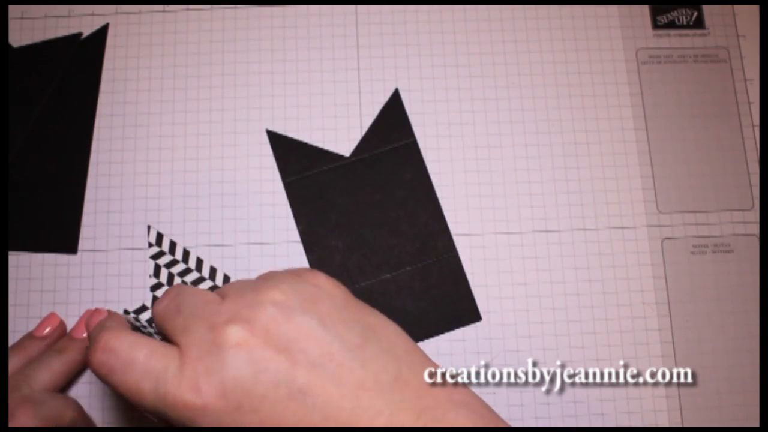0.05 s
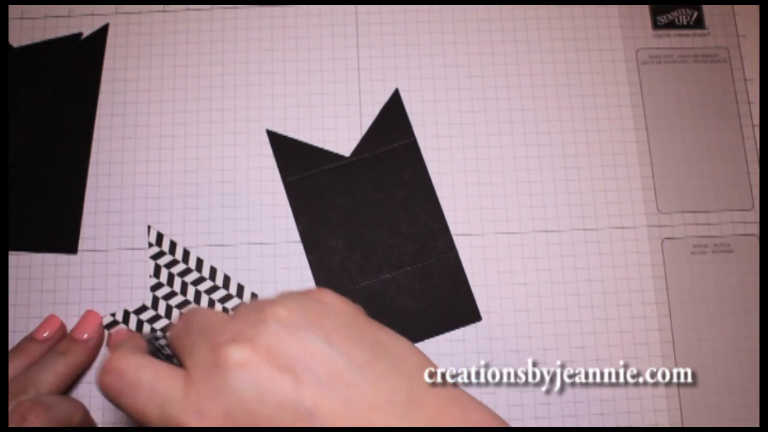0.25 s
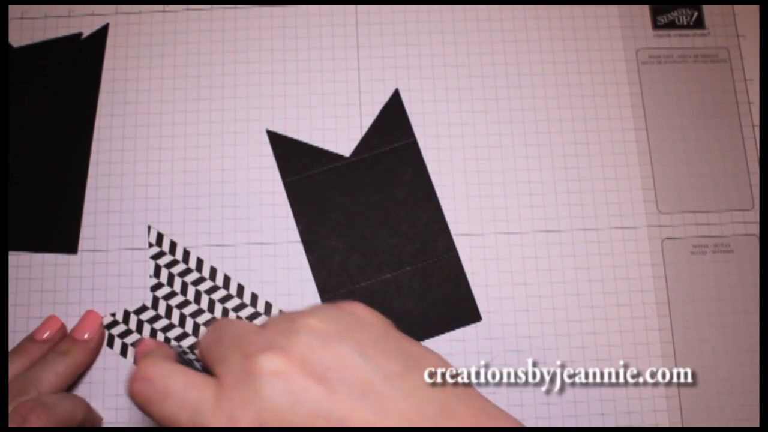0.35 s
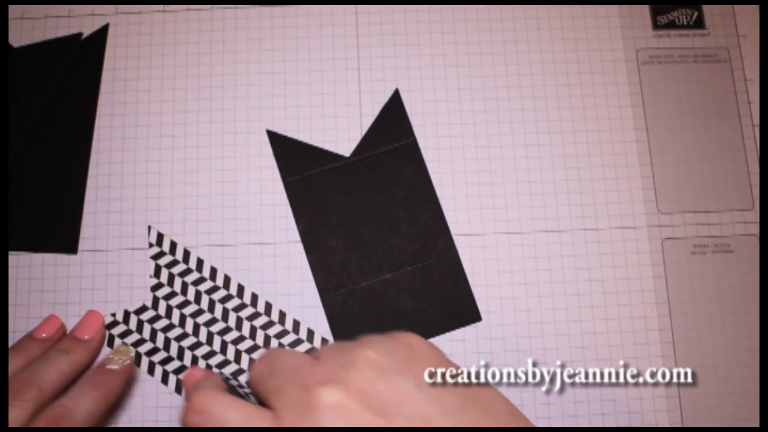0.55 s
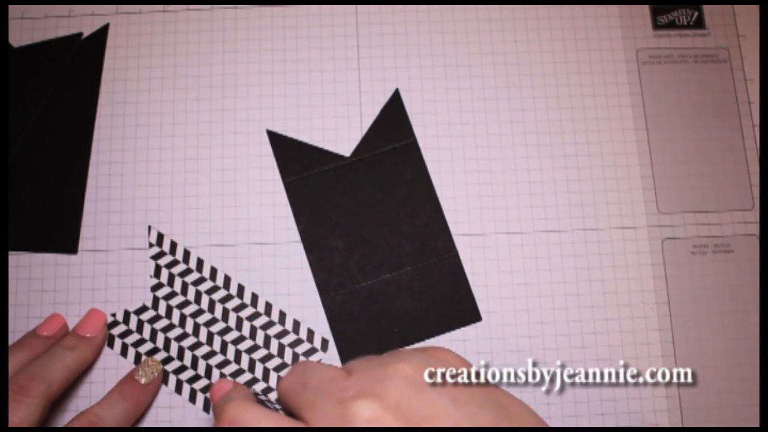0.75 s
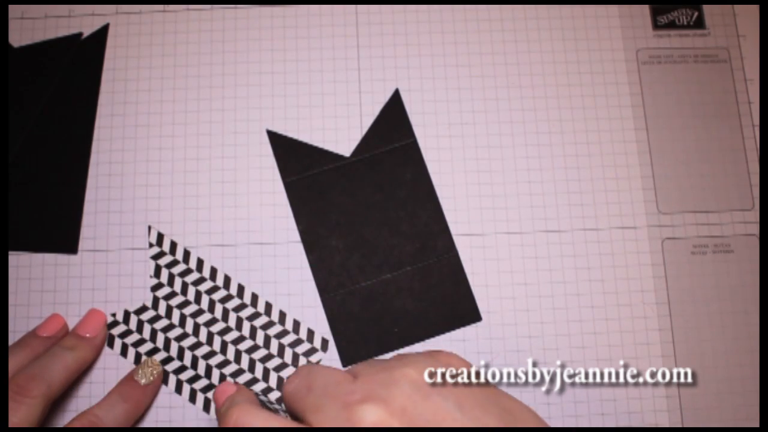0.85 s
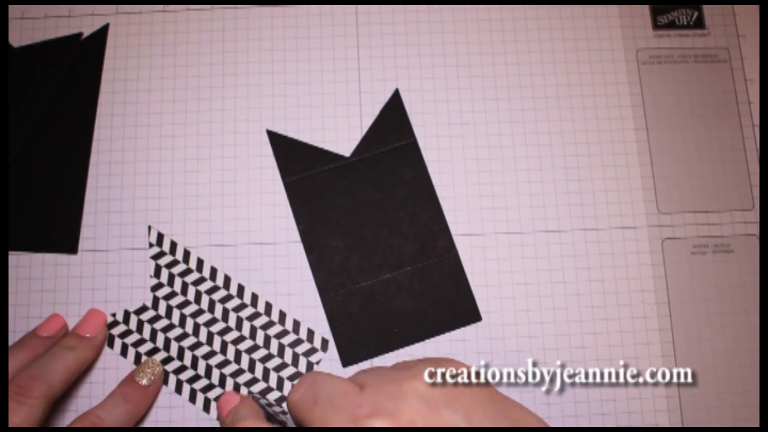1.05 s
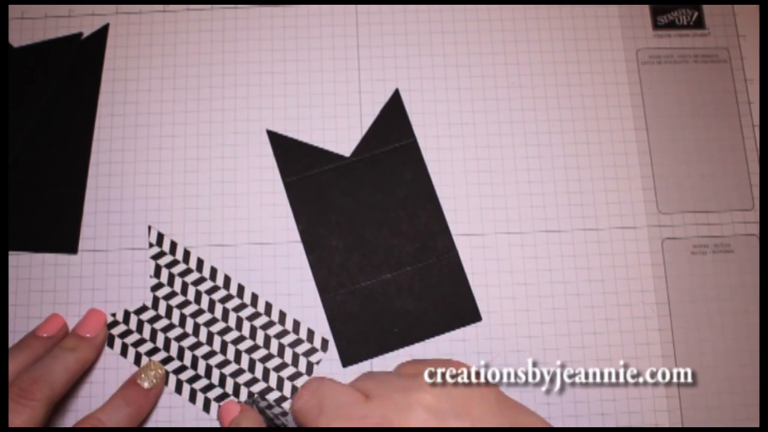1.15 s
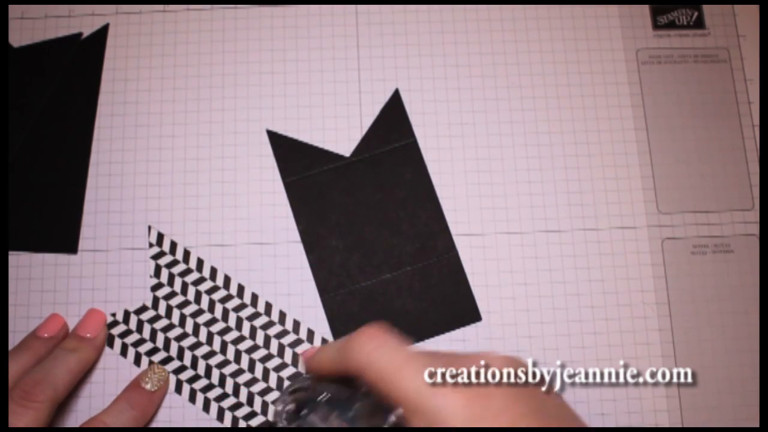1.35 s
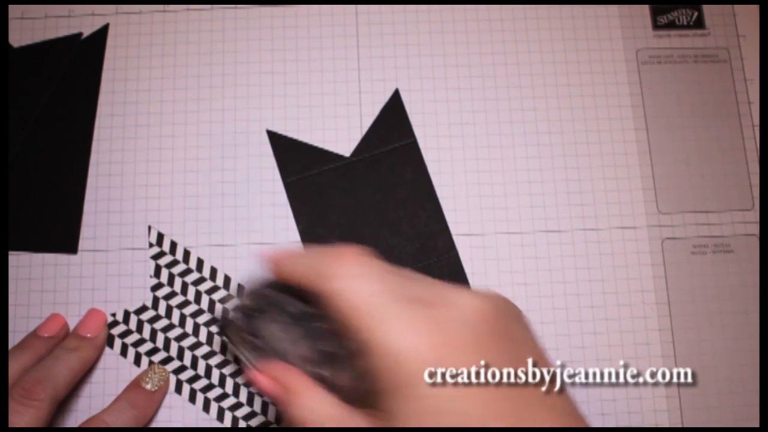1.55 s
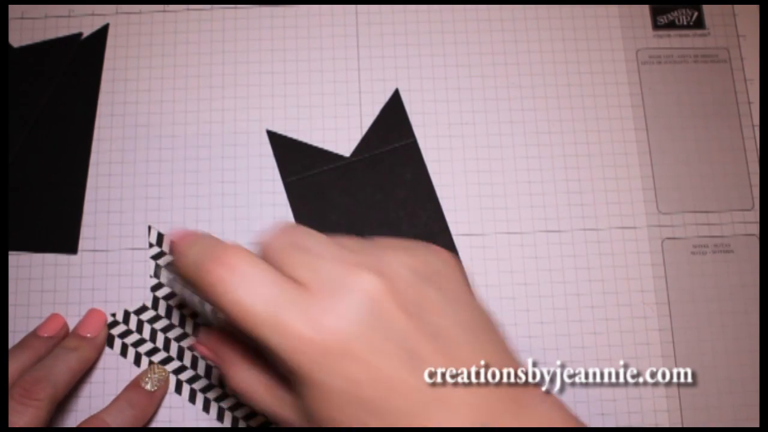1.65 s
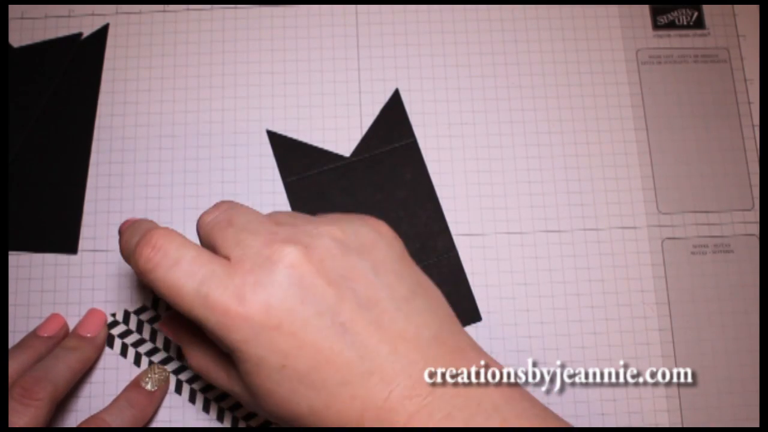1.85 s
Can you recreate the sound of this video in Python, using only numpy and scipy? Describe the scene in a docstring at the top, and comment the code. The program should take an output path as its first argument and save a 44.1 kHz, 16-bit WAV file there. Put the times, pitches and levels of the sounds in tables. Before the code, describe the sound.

Adhesive tape dispenser pulled over paper close up, rapid ratcheting buzz slowing to loose clacks and a snap

```python
"""A small room, close to the microphone: a plastic tape runner is pressed on paper and drawn across it.
Bursts of chatter ring its hollow case as ratchet clacks and handling knocks.
Its spool clicks tooth by tooth, fast enough to buzz at speed; roller and table add filtered noise.
The stroke slows, single ticks and clacks follow, and the runner is lifted with a snap.
Soft noise, a faint two-tone hum and a low rumble that comes and goes lie under it."""
import sys
import numpy as np
from scipy import signal
from scipy.fft import rfft, irfft
from scipy.io import wavfile
from scipy.ndimage import uniform_filter1d

SR = 44100
rng = np.random.default_rng(int(sys.argv[2]) if len(sys.argv) > 2 else 0)


def generate_wav(signal):
    """Clip the signal to [-1, 1] and save it as 16-bit WAV at the path in sys.argv[1]."""
    frames = np.transpose(np.atleast_2d(signal))
    scaled = np.clip(frames, -1, 1) * 32767
    pcm = np.round(scaled).astype(np.int16)
    wavfile.write(sys.argv[1], SR, pcm)


N = 83790

# low rumble that swells and fades: t/s, level/dB
RUMBLE_LEVEL = [(0, -55.5), (.35, -57), (.44, -83), (.69, -53.5), (.8, -73), (1.1, -70), (1.25, -55.5),
                (1.65, -71), (1.9, -52)]
# colour of the soft room noise: f/Hz, level/dB
FLOOR_COLOUR = [(25, -30), (62, -15.5), (150, -15.5), (600, -17), (2000, -26), (16000, -36)]
# steady hum tones: f/Hz, level/dB
HUM_TONES = [(97, -71), (119, -63)]
# colour of the paper scuff: f/Hz, level/dB
SCUFF_COLOUR = [(60, -18), (190, -0.5), (1200, -9.5), (16000, -27)]
# colour of the roller's rumble: f/Hz, level/dB
ROLLER_COLOUR = [(70, -18), (200, 8.5), (280, -11), (1500, -8)]
# colour of the room's tail: f/Hz, level/dB
ROOM_COLOUR = [(200, 3.5), (4500, 2), (8000, -1.5), (16000, -5.5)]
# ratchet clacks, levels before the layer trims: t/s, case ring level/dB, shell level/dB,
# strongest shell resonance f/Hz
RATCHET_CLACKS = [(0.2294, -26, -20, 3560), (0.2489, -25, -22, 4980), (0.2649, -23.5, -23, 3400),
                  (0.2806, -26, -22, 3480), (0.2981, -30.5, -22.5, 4260), (0.3144, -28, -24.5, 3480),
                  (0.3329, -27.5, -25.5, 4190), (0.352, -24.5, -25.5, 5560), (0.3704, -30, -29, 5230),
                  (0.3895, -29, -28, 3010), (0.4083, -38, -37, 2990), (0.4238, -39, -35, 5150),
                  (0.445, -37, -31, 5150), (0.4689, -48, -28.5, 5260), (0.4892, -26.5, -29.5, 5570),
                  (0.511, -30, -26, 5200), (0.529, -28, -24.5, 3020), (0.5465, -32, -24, 3000),
                  (0.5675, -33, -24.5, 5150), (0.5937, -31, -23.5, 2950), (0.6269, -30.5, -24, 2950),
                  (0.674, -30.5, -24, 5120), (0.722, -26, -22, 2930), (0.7487, -36, -22, 4360),
                  (0.781, -33, -23, 5380), (0.9222, -31, -20.5, 2970), (0.9879, -34, -24.5, 4670),
                  (1.108, -35.5, -32, 5180), (1.143, -31, -27.5, 2430)]
# knocks of the case as it is set down, shifted and lifted, levels before the layer trims:
# t/s, case ring level/dB, shell level/dB, treble level/dB, case ring f/Hz
CASE_KNOCKS = [(0.0273, -71, -40.5, -35.5, 1780), (0.0662, -43, -37, -75, 1830),
               (0.1137, -39, -34.5, -55, 1990), (0.1331, -32, -34.5, -43, 1780),
               (0.1446, -38.5, -37, -60, 1730), (.174, -33, -33, -67, 1765), (1.09, -46, -49, -32, 1300),
               (1.303, -32, -26, -22, 1243), (1.3051, -34.5, -29.5, -25.5, 1394)]
# shell resonances before detuning: f/Hz, level/dB
SHELL_MODES = [(2380, -2), (3000, 4.5), (3580, 4.5), (4320, -1), (5230, 3)]
# colour of the noise around the case ring: f/Hz, level/dB
CASE_COLOUR = [(80, -59), (350, -16.5), (800, -19.5), (1170, 4), (1480, -4.5), (1750, 4), (2100, -1),
               (3200, -42)]
# colour of the shell's rattle: f/Hz, level/dB
RATTLE_COLOUR = [(1400, -42), (2200, 9.5), (5000, 9.5), (6500, -6.5), (11000, -21)]
# colour of a clack's bright edge: f/Hz, level/dB
EDGE_COLOUR = [(1000, -35.5), (5000, -5), (10000, -9.5), (12300, -1), (16000, -6.5)]
# single spool ticks: t/s, level/dB
SINGLE_TICKS = [(0.153, -30.5), (.918, -26), (0.929, -25), (0.9392, -28), (0.9496, -33), (0.9586, -31),
                (1.142, -29), (1.272, -27.5), (1.2809, -20)]
# spool speed in the stroke: t/s, rate/(gear teeth per s)
SPOOL_SPEED = [(.23, 415), (.31, 355), (0.336, 312), (.375, 357), (.43, 295), (.46, 303), (.50, 360),
               (.55, 326), (.585, 217), (.635, 165), (.66, 108), (.69, 115), (0.731, 212), (.785, 145)]
# push on the runner, sets spool ticks (before their trim) and table drone: t/s, level/dB
STROKE_FORCE = [(.232, -44), (.25, -29), (.305, -41), (.345, -32), (.375, -36), (.40, -26.5), (.425, -31),
                (.46, -40.5), (.48, -38.5), (.535, -28.5), (.585, -31.5), (.615, -39), (.66, -37.5),
                (.71, -34.5), (.745, -33), (.785, -35.5)]
# colour of a spool tick: f/Hz, level/dB
TICK_COLOUR = [(150, -45), (1100, -19), (4000, -12.5), (8500, -11.5), (12200, -1.5), (16000, -1.5)]
# the spool's own bright resonances: f/Hz, level/dB
SPOOL_MODES = [(12350, 0.5), (13600, -3.5), (15000, -1.5)]

FLOOR_DB = -59.5
RUMBLE_HZ, RUMBLE_WIDTH_HZ = 111, 39

STROKE_START_S, STROKE_END_S = 0.232, 0.786
RETURN_S = 1.65  # the runner starts back over the paper
FADE_SAMPLES = SR // 25  # 40 ms smoothing of the stroke's start and end
SCUFF_DB, ROLLER_DB = -54, -53  # before their envelopes
TABLE_HZ, TABLE_WIDTH_HZ, TABLE_DB = 365.5, 15.5, -26  # level relative to the stroke force

ROOM_DB, ROOM_T60_S, ROOM_TREBLE_T60_S, ROOM_BUILDUP_S = -11, 0.33, 0.27, 0.0025

CLACK_ATTACK_S, CLACK_HOLD_S, CLACK_RELEASE_S = 0.0011, 0.004, 0.0021
EDGE_ATTACK_S, EDGE_HOLD_S, EDGE_RELEASE_S = 0.00059, 0.0027, 0.0026
RING_TRIM_DB, SHELL_TRIM_DB, EDGE_TRIM_DB = -0.5, -2, -2
RING_HZ, RING_WIDTH_HZ, RING_SCATTER = 1745, 380, 0.019
RING_NOISE_DB = -6  # relative to the case ring
SHELL_WIDTH_HZ, SHELL_FOLLOW, SHELL_SCATTER = 270, 0.7, 0.03  # follow: exponent on the ring's pitch
RATTLE_DB = -1  # relative to the shell resonances
MAIN_DB, EDGE_DB = -3.5, 0.5  # strongest resonance and bright edge of a clack, relative to the shell
KNOCK_OVERTONE = 2.08  # a knock's strongest shell resonance, as a multiple of its ring
SHELL_HIGHPASS = signal.butter(2, 1600, "high", fs=SR)
CLACK_WINDOW_S, TICK_WINDOW_S = 0.008, 0.004  # time over which an event's level is reckoned

SPOOL_TRIM_DB = 2
TICK_JITTER, TICK_SCATTER_DB = 0.006, 1.5
SLIP_SHARE, SLIP_FULL_RATE = 0.52, 330  # slip's place between teeth; teeth per s for full slip
TICK_RING_S, TICK_RING_DB, BOUNCE_S, BOUNCE_DB = 0.0012, -4.5, 0.0021, -7
LOOSE_DB, SINGLE_LOOSE = 12, 0.73  # extra rattle when fully loose; looseness of a single tick (0-1)
SPOOL_WIDTH_HZ = 450

TOP_HZ = 15820


def undb(db):
    """Decibels to gain."""
    return 10 ** (np.asarray(db) / 20)


def level(x, db):
    """Set the rms level, or scale a unit-rms sound along a level curve."""
    return x * undb(db) / np.sqrt(np.mean(x ** 2))


def unit(x):
    """Scale to an energy of one."""
    return x / np.sqrt(np.sum(x ** 2))


def add(out, start, x):
    """Mix a sound in at a time in seconds."""
    i = max(int(start * SR), 0)
    out[i:i + len(x)] += x[:len(out) - i]


def colour(x, points, size=1024):
    """Minimum-phase filter through (f/Hz, level/dB) points, so transients stay sharp at the front."""
    hz, db = np.array(points, float).T
    f = np.maximum(np.arange(size // 2 + 1) * SR / size, 1)
    # fold the cepstrum to make the filter causal
    cepstrum = irfft(np.log(undb(np.interp(np.log(f), np.log(hz), db))))
    cepstrum[1:size // 2] *= 2
    cepstrum[size // 2 + 1:] = 0
    response = irfft(np.exp(rfft(cepstrum)))
    return signal.fftconvolve(x, response)[:len(x)]


def resonate(x, hz, width_hz):
    """One resonance, gain 1 at its centre."""
    return signal.lfilter(*signal.iirpeak(hz, hz / width_hz, fs=SR), x)


def resonate_twice(x, hz, width_hz):
    """Two equal resonances in series, for steeper skirts."""
    return resonate(resonate(x, hz, width_hz), hz, width_hz)


def background():
    """Soft room noise, faint steady hum tones and a resonant low rumble that comes and goes."""
    t = np.arange(N) / SR
    out = level(colour(rng.standard_normal(N), FLOOR_COLOUR, size=8192), FLOOR_DB)
    for hz, db in HUM_TONES:
        out = out + level(np.sin(2 * np.pi * (hz * t + rng.random())), db)
    rumble = resonate_twice(rng.standard_normal(N), RUMBLE_HZ, RUMBLE_WIDTH_HZ)
    return out + level(rumble, np.interp(t, *np.array(RUMBLE_LEVEL).T))


def roller():
    """Paper scuffs before the stroke and on the way back; in it the roller rumbles and the table,
    one narrow resonance, drones with the push."""
    t = np.arange(N) / SR
    set_down = uniform_filter1d(1. * (t < STROKE_START_S), FADE_SAMPLES)
    bring_back = np.interp(t, [RETURN_S, t[-1]], [0, 0.5])
    scuff = (set_down + bring_back) * level(colour(rng.standard_normal(N), SCUFF_COLOUR), SCUFF_DB)
    rumble = level(colour(rng.standard_normal(N), ROLLER_COLOUR, size=4096), ROLLER_DB)
    push = undb(np.interp(t, *np.array(STROKE_FORCE).T))
    drone = push * level(resonate(rng.standard_normal(N), TABLE_HZ, TABLE_WIDTH_HZ), TABLE_DB)
    stroke = 1. * (t > STROKE_START_S) * (t < STROKE_END_S)
    return scuff + uniform_filter1d(stroke, FADE_SAMPLES) * (rumble + drone)


def room(x):
    """Diffuse tail of a small room: decaying noise whose treble dies first."""
    t = np.arange(SR // 2) / SR
    noise = rng.standard_normal(len(t))
    low = signal.sosfiltfilt(signal.butter(2, 8000, fs=SR, output="sos"), noise)
    low_tail = low * np.exp(-np.log(1000) * t / ROOM_T60_S)
    treble_tail = (noise - low) * np.exp(-np.log(1000) * t / ROOM_TREBLE_T60_S)
    buildup = np.minimum(t / ROOM_BUILDUP_S, 1) ** 2
    tail = colour(unit((low_tail + treble_tail) * buildup), ROOM_COLOUR)
    return undb(ROOM_DB) * signal.fftconvolve(x, tail)[:N]


def chatter(attack, hold, release, size=1024):
    """A few milliseconds of plastic parts rattling against each other, as shaped noise."""
    t = np.arange(size) / SR
    envelope = np.minimum(t / attack, 1) * np.exp(-np.maximum(t - hold, 0) / release)
    return rng.standard_normal(size) * envelope


def clack(ring_db, shell_db, edge_db, ring_hz, main_hz):
    """Chatter rings the hollow case and its shell, where one resonance stands out, with a bright edge."""
    push, knock, rattle = (chatter(CLACK_ATTACK_S, CLACK_HOLD_S, CLACK_RELEASE_S) for _ in range(3))
    ring = unit(resonate_twice(push, ring_hz, RING_WIDTH_HZ))
    ring = ring + undb(RING_NOISE_DB) * unit(colour(knock, CASE_COLOUR))

    # the shell's pitch partly follows the case ring
    detune = (ring_hz / RING_HZ) ** SHELL_FOLLOW * (1 + SHELL_SCATTER * rng.standard_normal())
    shell = sum(undb(db) * unit(resonate(push, hz * detune, SHELL_WIDTH_HZ)) for hz, db in SHELL_MODES)
    shell = unit(shell) + undb(RATTLE_DB) * unit(colour(rattle, RATTLE_COLOUR))
    main = resonate_twice(knock, main_hz, RING_WIDTH_HZ)
    shell = unit(signal.lfilter(*SHELL_HIGHPASS, shell)) + undb(MAIN_DB) * unit(main)

    edge = colour(chatter(EDGE_ATTACK_S, EDGE_HOLD_S, EDGE_RELEASE_S), EDGE_COLOUR)
    parts = undb(ring_db + RING_TRIM_DB) * unit(ring)
    parts = parts + undb(shell_db + SHELL_TRIM_DB) * unit(shell)
    parts = parts + undb(edge_db + EDGE_TRIM_DB) * unit(edge)
    return parts * np.sqrt(CLACK_WINDOW_S * SR)


def case():
    """Handling knocks and ratchet clacks, all ringing the same plastic case."""
    out = np.zeros(N)
    for start, ring_db, shell_db, main_hz in RATCHET_CLACKS:
        ring_hz = RING_HZ * (1 + RING_SCATTER * rng.standard_normal())
        add(out, start, clack(ring_db, shell_db, shell_db + EDGE_DB, ring_hz, main_hz))
    for start, *levels, ring_hz in CASE_KNOCKS:
        add(out, start, clack(*levels, ring_hz, KNOCK_OVERTONE * ring_hz))
    return out


def tick(start, db, loose, size=256):
    """A sharp click, timed between samples; its rattle and bounce off the table grow with looseness."""
    n = np.arange(size)
    ring, bounce = rng.standard_normal((2, size)) * np.exp(-n / SR / TICK_RING_S)
    rattle = undb(TICK_RING_DB) * unit(ring)
    add(rattle, BOUNCE_S, undb(BOUNCE_DB) * unit(bounce))
    click = np.sinc(n - 10 - start * SR % 1)
    return undb(db) * unit(click + undb(LOOSE_DB * loose) * rattle)


def spool(size=512):
    """Each tooth ticks as it catches and, at speed, again as it slips off; nudges give single ticks."""
    out = np.zeros(N)
    for start, db in SINGLE_TICKS:
        add(out, start, tick(start, db, SINGLE_LOOSE))

    force, speed = np.array(STROKE_FORCE).T, np.array(SPOOL_SPEED).T
    now = STROKE_START_S
    while now < STROKE_END_S:
        stretch, catch, slip = rng.standard_normal(3)
        rate = np.interp(now, *speed)
        db = np.interp(now, *force) + SPOOL_TRIM_DB
        taut = min(rate / SLIP_FULL_RATE, 1) ** 2  # a slow spool hangs loose
        later = now + SLIP_SHARE / rate
        add(out, now, tick(now, db + TICK_SCATTER_DB * catch, 1 - taut))
        add(out, later, taut * tick(later, db + TICK_SCATTER_DB * slip, 1 - taut))
        now += np.exp(TICK_JITTER * stretch) / rate

    bright = colour(signal.unit_impulse(size), TICK_COLOUR)
    whirr = sum(undb(db) * resonate(bright, hz, SPOOL_WIDTH_HZ) for hz, db in SPOOL_MODES)
    return signal.fftconvolve(out, unit(bright + whirr))[:N] * np.sqrt(TICK_WINDOW_S * SR)


def scene():
    """The runner heard directly; its front and its back send different rattles into the room."""
    steady = spool() + roller()
    front, back = case() + steady, case() + steady
    reflections = (room(front) + room(back)) / np.sqrt(2)
    return (front + reflections + background())[None]


def record(dry):
    """The recorder cuts the top with a steep linear-phase low-pass."""
    lowpass = signal.firwin(601, TOP_HZ, fs=SR, window="blackman")
    return signal.fftconvolve(dry, lowpass[None], mode="same")


dry = scene()
out = record(dry)
generate_wav(out)
```